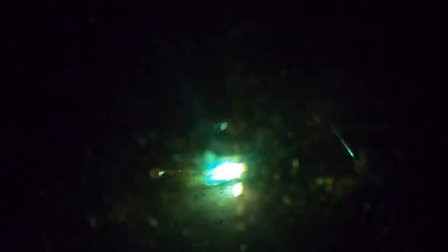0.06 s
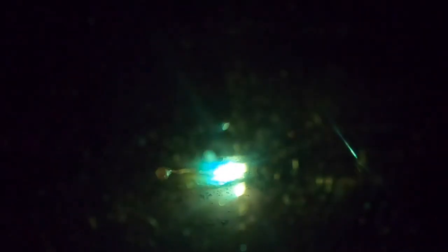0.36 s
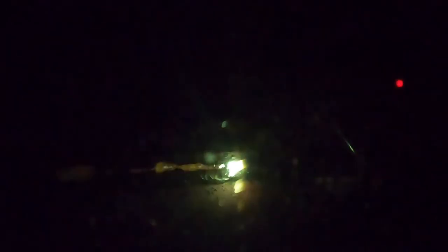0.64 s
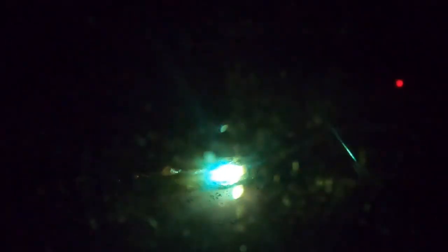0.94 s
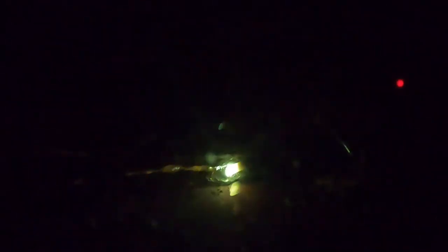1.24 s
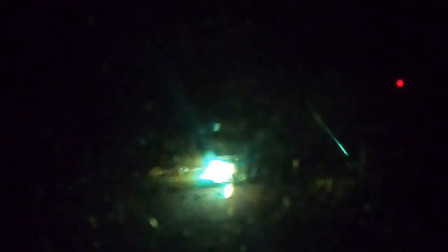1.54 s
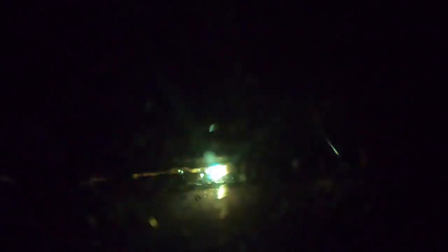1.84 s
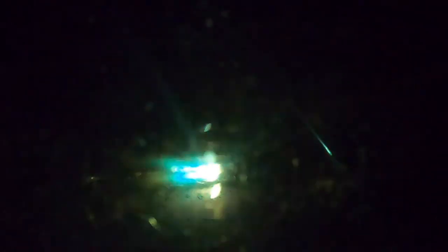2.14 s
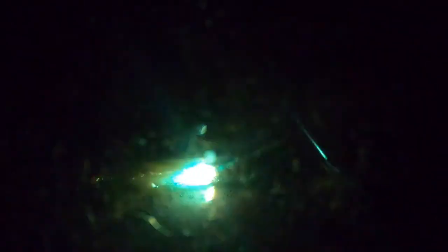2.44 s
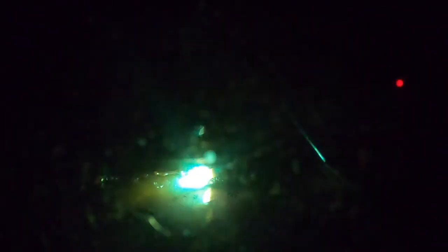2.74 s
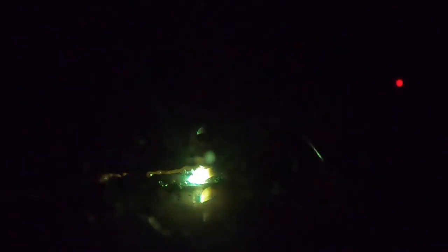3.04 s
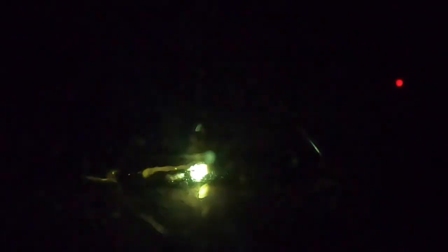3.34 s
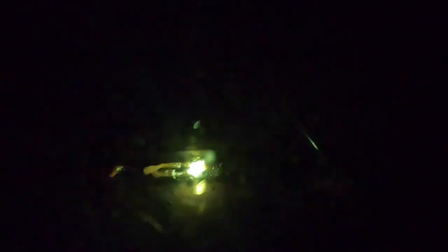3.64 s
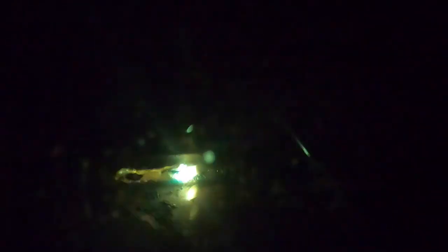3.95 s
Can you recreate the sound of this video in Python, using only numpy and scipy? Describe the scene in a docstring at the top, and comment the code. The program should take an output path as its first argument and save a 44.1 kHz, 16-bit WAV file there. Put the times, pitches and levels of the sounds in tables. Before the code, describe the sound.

An electric arc gouges steel close by, hissing, roaring and crackling over a low flutter. It burns from about 0.1 to 0.7 seconds, then sputters in quick bursts, holding longer around 1.5 to 1.8, 2.8 to 3.1 and from 3.8 seconds. Bursts start with a bright spit and break with a puff. A faintly whistling air jet, machine hum and workshop rumble continue throughout.

```python
"""A carbon arc gouges steel in a workshop. It burns in spells: each strikes with a bright spit,
roars and crackles over the boom and flutter of pulsing hot gas, and breaks with a puff.
A compressed-air jet hisses and whistles throughout, swelling just before each strike.
Roar, spit and hiss excite the same fixed, hollow resonances and reflect from steel close by.
A machine hums steadily over the rumble of the workshop."""
import sys
import numpy as np
from scipy import signal
from scipy.fft import rfft, irfft
from scipy.io import wavfile
from scipy.ndimage import uniform_filter1d, minimum_filter1d, map_coordinates

SR = 44100
rng = np.random.default_rng(int(sys.argv[2]) if len(sys.argv) > 2 else 0)


def bounce(signal):
    """Save signal as a 16-bit WAV file at the path given by the first command-line argument."""
    frames = np.transpose(np.atleast_2d(signal))
    limited = np.clip(frames, -1, 1)
    pcm = np.round(limited * 32767).astype(np.int16)
    wavfile.write(sys.argv[1], SR, pcm)


N = 176400

# Spells of the arc: strike t/s, break t/s, relative level/dB of roar, boom, flutter, spit, puff
ARC_SPELLS = [(0.028, 0.074, -19, -17, -27, 0.5, -2), (0.116, 0.708, -18, -20.5, -17.5, 0.5, -7),
              (0.824, 0.888, -18, -15, -26, 0, -2), (0.952, 1.076, -17.5, -17, -16, 0, 5.5),
              (1.155, 1.286, -16.5, -19, -17.5, -1.5, 5.5), (1.377, 1.433, -16.5, -18.5, -15.5, -7.5, -15),
              (1.475, 1.811, -17, -18, -17, -2.5, -14), (1.846, 1.913, -16.5, -15.5, -18.5, -1.5, -2),
              (1.965, 2.038, -16, -16, -15.5, -6, -6), (2.127, 2.265, -17.5, -15.5, -21, -1.5, 2),
              (2.308, 2.454, -17, -14, -20, 1, -7), (2.531, 2.586, -17.5, -15.5, -20.5, -3.5, -4),
              (2.64, 2.705, -14.5, -14, -24, -17, 1), (2.819, 3.1, -17, -17.5, -20, -1.5, -0.5),
              (3.173, 3.19, -13, -21, -15, -3, 1), (3.235, 3.248, -13, -16, -18, -7, 6.5),
              (3.308, 3.438, -16.5, -17, -17.5, -13, 1), (3.523, 3.572, -15.5, -13.5, -19, -2.5, 2.5),
              (3.617, 3.746, -16.5, -15, -32, -0.5, -13), (3.789, 4.055, -16.5, -18.5, -18.5, -6, -1)]
# Resonances (+) and hollows (-) between torch and listener: f/Hz, width/Hz, gain/dB
PATH_RESONANCES = [(517, 159, 13), (1050, 57, -14), (1159, 98, 24), (1638, 150, 25.5), (1730, 125, 17),
                   (1898, 129, -14), (2017, 27, 17), (2290, 56, 12), (2443, 55, 14), (2547, 142, 9),
                   (2750, 70, 7), (2840, 150, 6), (2992, 58, 12), (3075, 78, -10), (3263, 60, 7),
                   (3603, 135, 17), (3868, 130, -11), (3980, 50, 10), (4199, 120, 4), (5340, 160, -6),
                   (5880, 140, 11), (6025, 176, -12), (6320, 90, 12), (6650, 150, 6), (6965, 110, 8),
                   (7075, 72, -6), (7165, 78, 5), (7610, 130, 7), (8270, 50, -9), (8360, 100, 6),
                   (8630, 113, 5), (9056, 60, 5), (9390, 350, 6), (10170, 160, 6)]
# Whistles of the air jet: f/Hz, width/Hz, level/dB
JET_WHISTLES = [(1645, 22, -43), (2018, 16, -49.5), (1160, 25, -54)]
# Spectral densities of the noises: f/Hz, relative level/dB
RUMBLE_SPECTRUM = [(15, -53), (30, 0.5), (48, -4.5), (68, -0.5), (100, -6.5), (170, 0.5), (230, -13),
                   (320, -17), (430, -53), (900, -50)]
JET_SPECTRUM = [(150, -94), (380, -75), (750, -83.5), (1350, -80), (2400, -73), (3300, -61), (4800, -61),
                (7000, -68), (10000, -71.5), (12500, -81), (15000, -117)]
FLUTTER_SPECTRUM = [(40, -18.5), (90, -24.5), (135, 2), (175, 1), (215, -3.5), (250, -14), (295, -13),
                    (370, -26), (600, -49), (1200, -50)]
PUFF_SPECTRUM = [(90, -31.5), (160, -1), (230, 6), (330, -9), (420, -14.5), (520, -14), (800, -35),
                 (1500, -49)]
SPIT_SPECTRUM = [(1000, -48), (3000, -5.5), (6000, 4), (9000, -4), (12500, -15), (15000, -29)]
ROAR_SPECTRUM = [(150, -88.5), (380, -71), (750, -77.5), (1350, -78.5), (2400, -70.5), (3300, -59),
                 (4800, -62.5), (7000, -67), (10000, -78), (12500, -87.5), (15000, -115)]
# Slow drift of three bands of the torch sound: t/s, gain/dB
LOW_DRIFT = [(0, 3.5), (.8, 1), (1.2, 3), (2.1, 1), (2.6, -3.5), (4, -1.5)]
MIDDLE_DRIFT = [(0, 2.5), (.7, 2), (1.3, -0.5), (2.2, -1), (3, -1), (4, -2)]
TREBLE_DRIFT = [(0, -1.5), (.7, 0.5), (1.3, 0), (1.7, 3.5), (2.2, 4.5), (2.6, 1), (3.2, 0), (4, -3.5)]

ATTACK_S, RELEASE_S = .012, 0.0061  # linear rise; decay by 1/e
LOW_LAG_S, LOW_RELEASE_S = 0.0059, 0.0078  # the lows come late and linger
JET_DB, SWELL_DB, SWELL_S = -34, 5, 0.03
PULSE_HZ, WANDER_HZ, QUICKEN_HZ = 110.15, 4.18, 54.97
BOOM_DB, FLUTTER_DB, PUFF_DB = -2, -3.5, -23
SPIT_DB, SPIT_RISE_S, SPIT_DECAY_S = -22, 0.006, 0.05
ROAR_DB, THROB_DB = -1.25, 1.07
SPUTTER_DB, SPUTTER_PER_S = 1, 70  # uneven melting
FIZZ_DB, FIZZ_PER_S = 1.5, 900  # the arc root jumping about
CRACKS_PER_S, CRACK_SPREAD_DB, CRACK_DB = 1500, 3.5, -6.5


def undb(db):
    return 10 ** (np.asarray(db) / 20)


def unit(x):
    return x / np.sqrt(np.mean(x ** 2))


def walk(rate):
    """Interpolated noise: a smooth curve through `rate` random values a second, rms 1."""
    knots = rng.standard_normal(N)
    return unit(map_coordinates(knots[:N // 8], [np.arange(N) * rate / SR], order=2, mode="mirror"))


def colour(x, spectrum, peaks=()):
    """Minimum-phase filtering: a smooth spectrum with ringing resonances on top; output rms 1."""
    size = 2 * N
    f = np.arange(N + 1) * SR / size
    points = np.array(spectrum, float)
    db = np.interp(np.log(f + 1), np.log(points[:, 0]), points[:, 1])
    for hz, width, height in peaks:
        db = db + height / (1 + (2 * (f - hz) / width) ** 2)
    cepstrum = irfft(np.log(undb(db)))
    cepstrum[1:N] *= 2  # folding the cepstrum makes the filter causal
    cepstrum[N + 1:] = 0
    return unit(irfft(rfft(x, size) * np.exp(rfft(cepstrum)))[:N])


def spell(t, on, off, release):
    """Envelope of one burn: linear attack, hold, exponential decay."""
    return np.clip((t - on) / ATTACK_S + .5, 0, 1) * np.exp(-np.maximum(t - off, 0) / release)


def cusp(t, at, rise, decay):
    """Exponential growth to 1 at time `at`, then exponential decay."""
    return np.exp(-np.abs(t - at) / np.where(t < at, rise, decay))


def machine(t):
    """A hum, weakly modulated in phase and amplitude, over the low noise of the workshop."""
    hum_hz, hum_db, rumble_db = 84.5, -28, -26
    hum = np.sin(2 * np.pi * hum_hz * t + 0.75 * walk(5.58)) * undb(0.74 * walk(7.58))
    rumble = colour(rng.standard_normal(N), RUMBLE_SPECTRUM)
    return undb(hum_db) * unit(hum) + undb(rumble_db) * rumble


def air_jet(t):
    """Jet noise: narrow-band whistles, and a hiss that swells as the electrode nears the plate."""
    closeness = sum(cusp(t, on, SWELL_S, RELEASE_S) for on, *_ in ARC_SPELLS)
    jet = colour(rng.standard_normal(N), JET_SPECTRUM, PATH_RESONANCES)
    jet *= undb(JET_DB + SWELL_DB * closeness + 0.27 * walk(54))
    for hz, width, db in JET_WHISTLES:
        envelope = walk(width) + 1j * walk(width)
        jet += undb(db) * unit(np.real(envelope * np.exp(2j * np.pi * hz * t)))
    return jet


def gas_phase(t):
    """Frequency modulation: the gas pulses wander in rate and quicken before each break."""
    quicken = sum(cusp(t, off, rise=.022, decay=LOW_RELEASE_S) for _, off, *_ in ARC_SPELLS)
    return 2 * np.pi * np.cumsum(PULSE_HZ + QUICKEN_HZ * quicken + WANDER_HZ * walk(40)) / SR


def hot_gas(t, phase):
    """Pulsating gas radiates a boom and an irregular flutter, ending in a puff as the arc breaks."""
    harmonics = np.sin(phase) + undb(-18) * np.cos(2 * phase)
    boom = undb(BOOM_DB) * unit(harmonics * undb(1.25 * walk(35)))
    flutter = undb(FLUTTER_DB) * colour(rng.standard_normal(N), FLUTTER_SPECTRUM)
    puff = undb(PUFF_DB) * colour(rng.standard_normal(N), PUFF_SPECTRUM)
    gas = np.zeros(N)
    for on, off, _, boom_db, flutter_db, _, puff_db in ARC_SPELLS:
        burning = spell(t - LOW_LAG_S, on, off, LOW_RELEASE_S)
        gas += burning * (undb(boom_db) * boom + undb(flutter_db) * flutter)
        gas += undb(puff_db) * cusp(t, off, rise=0.013, decay=LOW_RELEASE_S) * puff
    return gas


def strike_spit(t):
    """Onset transient: a short bright sizzle as the electrode touches and the arc strikes."""
    envelope = np.zeros(N)
    for on, off, _, _, _, spit_db, _ in ARC_SPELLS:
        quench = np.exp(-np.maximum(t - off, 0) / RELEASE_S)
        envelope += undb(SPIT_DB + spit_db) * cusp(t, on, SPIT_RISE_S, SPIT_DECAY_S) * quench
    sizzle = rng.standard_normal(N) * undb(2.0 * walk(1200))
    return envelope * colour(sizzle, SPIT_SPECTRUM, PATH_RESONANCES)


def arc_roar(t, phase):
    """Source and filter: hiss and cracks, modulated by melting and gas pulses, drive the resonances."""
    burning = sum(undb(db) * spell(t, on, off, RELEASE_S) for on, off, db, *_ in ARC_SPELLS)
    hiss = unit(rng.standard_normal(N) * undb(FIZZ_DB * walk(FIZZ_PER_S)))
    sizes = undb(CRACK_SPREAD_DB * np.minimum(rng.exponential(size=N), 5))
    signs = np.sign(rng.standard_normal(N))
    cracks = unit(sizes * signs * (rng.random(N) < CRACKS_PER_S / SR))
    modulation = undb(SPUTTER_DB * walk(SPUTTER_PER_S) + THROB_DB * np.sin(phase))
    source = burning * unit((hiss + undb(CRACK_DB) * cracks) * modulation)
    return undb(ROAR_DB) * np.std(source) * colour(source, ROAR_SPECTRUM, PATH_RESONANCES)


def steel_reflections(x, spread_s=.02, echo_db=-13, above_hz=5800):
    """Interference: twelve short reflections from nearby steel comb the treble."""
    scatter = np.arange(1, 13) * (np.sqrt(5) - 1) / 2 % 1  # golden-ratio steps space them unevenly
    lags = (0.001002 + spread_s * scatter ** 1.3) * SR
    bright = signal.sosfilt(signal.butter(2, above_hz, "high", fs=SR, output="sos"), x)
    echoes = sum(np.pad(bright, (int(lag), 0))[:N] for lag in lags)
    return x + undb(echo_db) * echoes / np.sqrt(len(lags))


def band_drift(x, t, low_hz=785, middle_hz=2210, treble_hz=7800):
    """Time-varying filtering: the lows, middle and treble drift slowly in level."""
    f = np.arange(N + 1) * SR / (2 * N)
    spectrum = rfft(x, 2 * N)
    low = irfft(spectrum / (1 + (f / low_hz) ** 8))[:N]
    middle = irfft(spectrum / (1 + (f / middle_hz) ** 8))[:N] - low
    treble = x - irfft(spectrum / (1 + (f / treble_hz) ** 4))[:N]
    for band, drift in (low, LOW_DRIFT), (middle, MIDDLE_DRIFT), (treble, TREBLE_DRIFT):
        gain = undb(np.interp(t, *np.array(drift).T))
        x = x + (gain - 1) * band
    return x


def scene():
    """Superposition of torch, gas and machine; roar and boom share one pulsation."""
    t = np.arange(N) / SR
    phase = gas_phase(t)
    torch = arc_roar(t, phase) + strike_spit(t) + air_jet(t)
    torch = band_drift(steel_reflections(torch), t)
    return (torch + hot_gas(t, phase) + machine(t))[None]


def record(dry):
    """Peak limiting holds down the loudest moments; a steep low-pass cuts the top."""
    ceiling, window, top_hz = .68, int(0.012 * SR), 15200
    peak = -minimum_filter1d(-np.abs(dry), window)
    gain = uniform_filter1d(np.minimum(1, ceiling / (peak + 1e-9)), window)
    return signal.sosfilt(signal.ellip(10, .1, 80, top_hz, fs=SR, output="sos"), dry * gain)


dry = scene()
out = record(dry)
bounce(out)
```